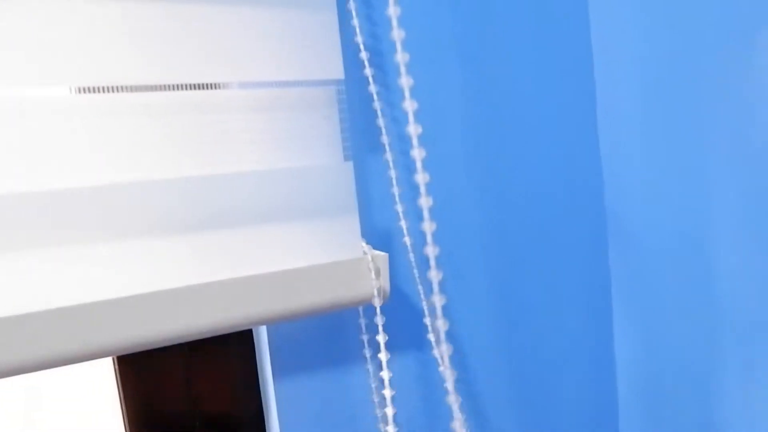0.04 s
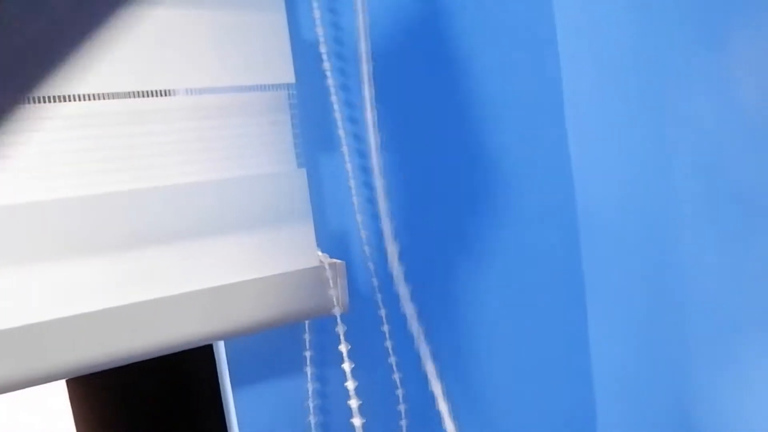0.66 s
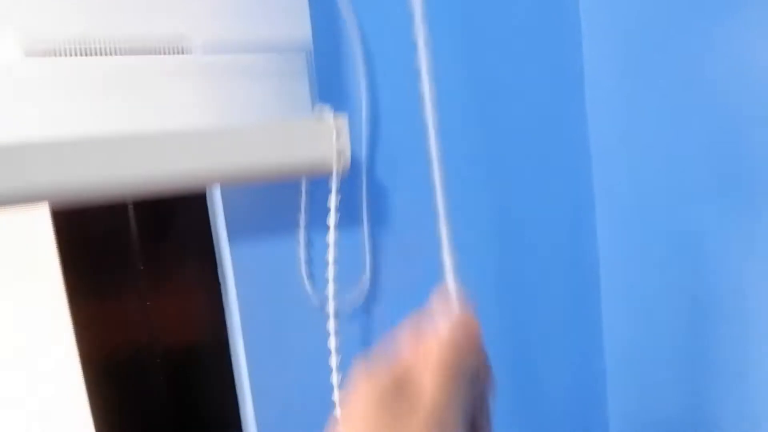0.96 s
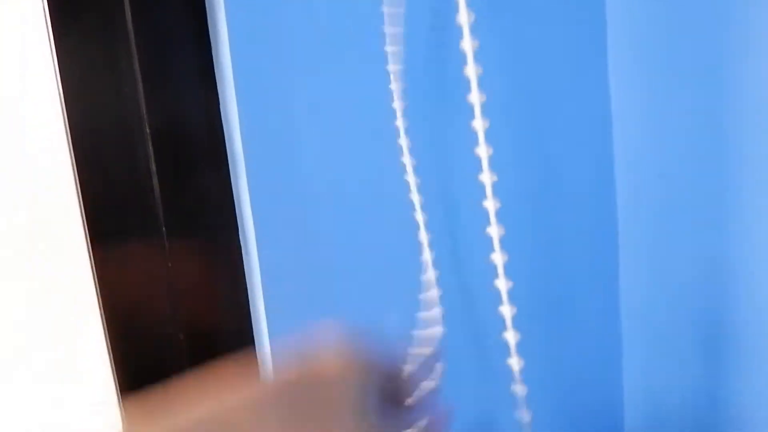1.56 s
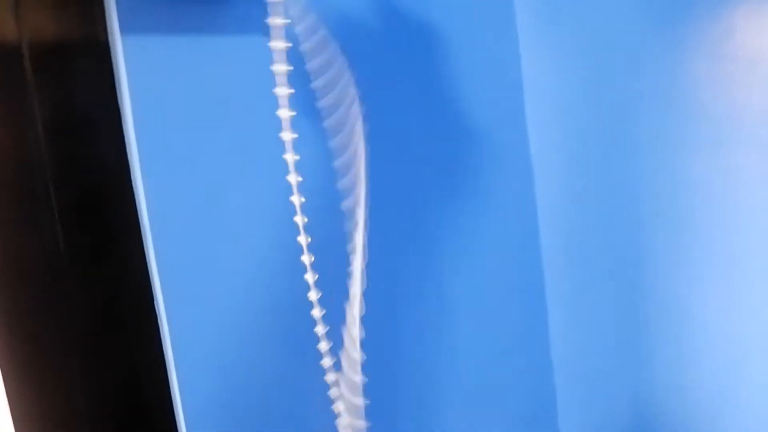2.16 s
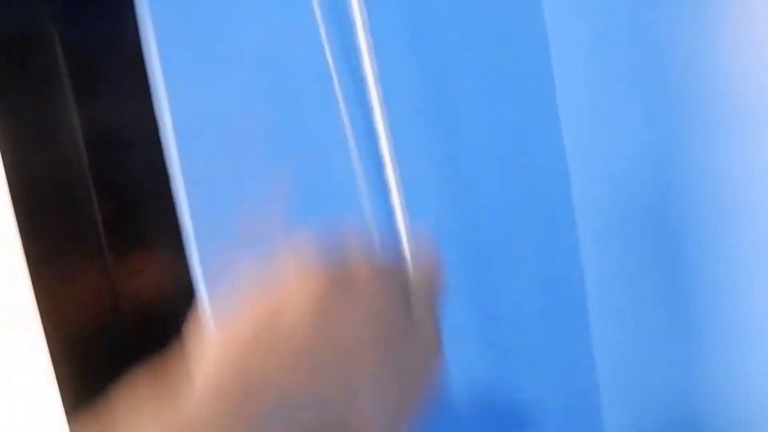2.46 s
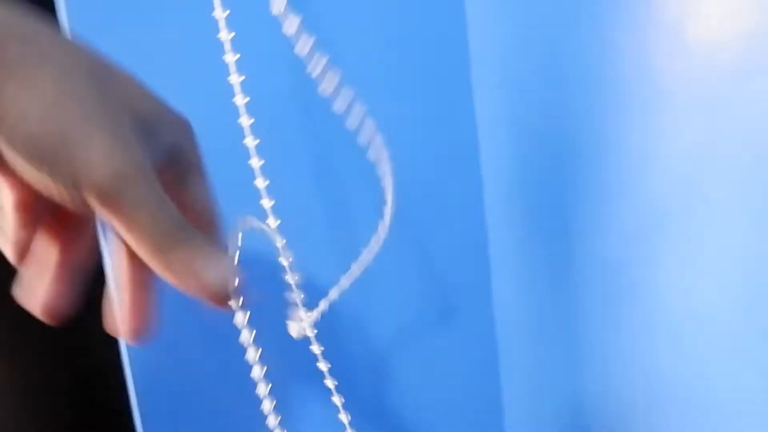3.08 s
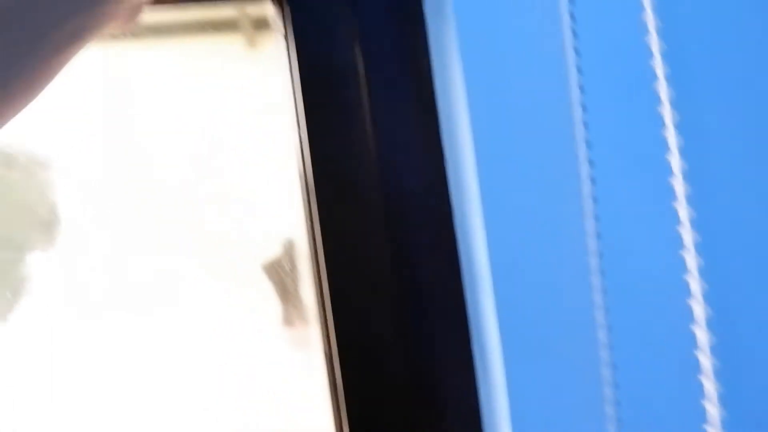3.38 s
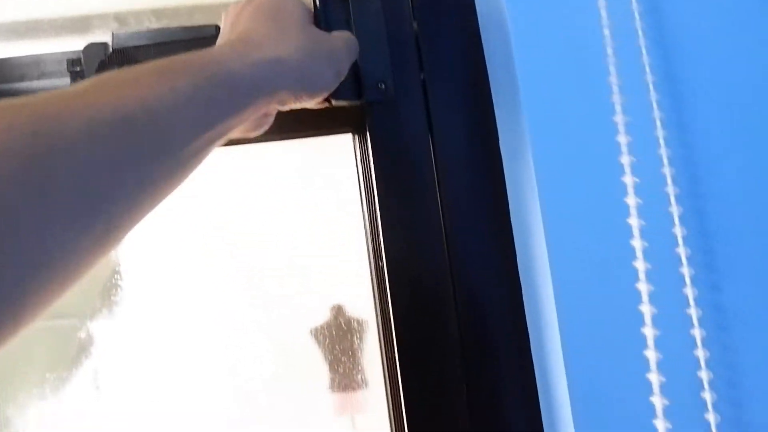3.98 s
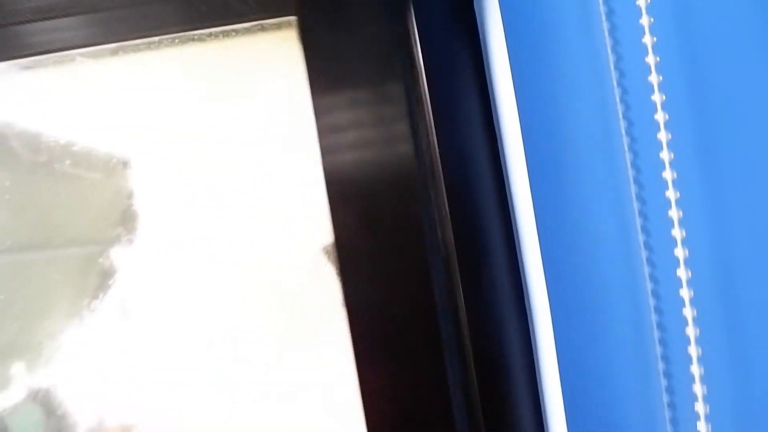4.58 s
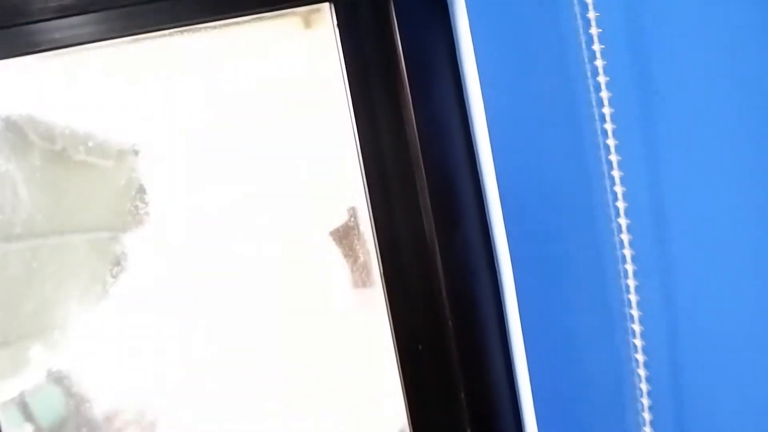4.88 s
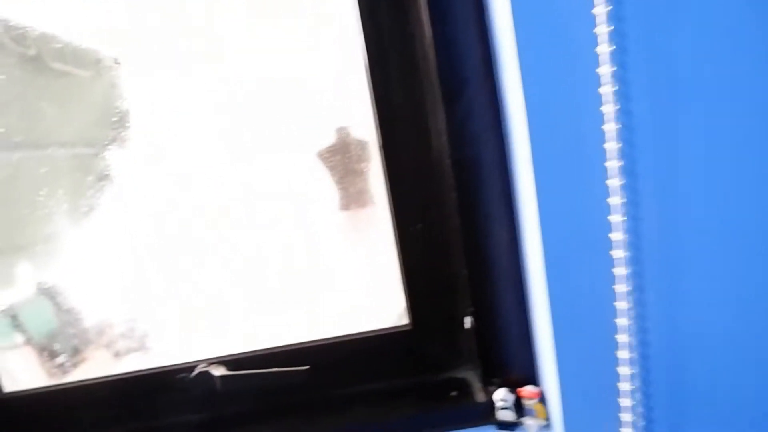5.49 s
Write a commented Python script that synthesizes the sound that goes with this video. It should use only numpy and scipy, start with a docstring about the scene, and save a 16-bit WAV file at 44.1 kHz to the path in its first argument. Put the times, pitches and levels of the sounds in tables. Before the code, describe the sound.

Two bursts of bead chain rattling and hollow rumbling come from a nearby roller blind being raised indoors. Between and after the pulls, the loose chain clicks and rings against a metal frame. Soft latch bumps and rubbing follow, then one heavy window knock, a low shudder of glass and a short scrape of seals, over a faint, steady hush with a little room echo.

```python
"""A roller blind is hauled up in two pulls on its plastic bead chain, in a small room.
Beads rattle through the sprocket (the toothed wheel), the blind's tube rumbles and jolts,
and the slack chain clacks on the metal window frame and makes it ring. Then a hand works the latch,
the frame gives with a knock, and the window scrapes open on its seals while the pane shudders.
A steady hush from outdoors and the room lies under it all."""
import sys
import numpy as np
from scipy import signal
from scipy.io import wavfile
from scipy.ndimage import uniform_filter1d

SR = 44100
rng = np.random.default_rng(int(sys.argv[2]) if len(sys.argv) > 2 else 0)


def inscribe(sig):
    """Save sig as 16-bit PCM at rate SR to the path in sys.argv[1].

    A 1-D sig is mono; a 2-D sig holds one channel per row.
    Samples are clipped to [-1, 1] before scaling.
    """
    pcm = np.round(np.clip(np.atleast_2d(sig).T, -1, 1) * 32767)
    wavfile.write(sys.argv[1], SR, pcm.astype(np.int16))


N = 244174
TIME = np.arange(N) / SR
AGE = TIME[:SR // 2]  # seconds since a hit
TOP_HZ = 15900

# Levels are relative. fade_s is the time to fall 60 dB, rise_s the time to climb 60 dB.
# pulls on the chain: grip_s, fastest_s, let_go_s, rise_s, beads_db, tube_db
PULLS = [(0, 0.017, 0.024, 0.009, -59, -22.5), (0.833, 1.173, 1.262, 0.019, -23, -23.5),
         (2.368, 2.508, 2.732, 0.49, -17, -23.5)]
# the tube lurches round under a tug: start_s, length_s, level_db
LURCHES = [(0.84, 0.037, -12.5), (1.151, 0.026, -19.5), (1.402, 0.025, -23), (2.155, 0.025, -23.5),
           (2.395, 0.053, -12.5), (2.596, 0.077, -22), (2.845, 0.034, -22)]
LURCH_RISE_S, LURCH_FADE_S = 0.047, 0.099
# the tube jolts in its brackets: start_s, level_db, brightness_db, fade_s
JOLTS = [(0.04, -20.5, -10, 0.057), (0.833, -6.5, 4.5, 0.11), (0.845, -3, 18, 0.031),
         (0.869, -15, -7, 0.12), (0.891, -1.5, 1, 0.038), (0.902, -3.5, -9, 0.068),
         (1.072, -12, 3.5, 0.037), (1.137, -19.5, 28, 0.28), (1.166, -10.5, 7, 0.06),
         (1.192, -14, 0, 0.029), (1.261, -11.5, 6, 0.45), (1.386, -19.5, -10, 0.04), (1.542, -14, 7, 0.05),
         (1.557, -15, 4, 0.041), (1.573, -12, 5, 0.14), (2.359, -8, -31, 0.13), (2.46, -12, -3, 0.056),
         (2.693, -9, 0.5, 0.22), (2.808, -19, -2.5, 0.11), (2.842, -14.5, 3, 0.088)]
# light ticks of beads and latch: start_s, level_db, brightness_db
TICKS = [(0.35, -40.5, 20), (0.522, -40.5, 19), (1.7377, -26.5, -6), (1.7733, -32, 24), (1.836, -32.5, 22),
         (2.8975, -33, 13), (3.4108, -33.5, 3), (3.652, -27, -16), (4.5292, -24.5, -20), (4.874, -36.5, 3),
         (5.018, -28.5, -1.5), (5.0417, -25.5, -9)]
# the chain hits the frame and its fittings: start_s, level_db, pitch_hz, brightness_db, fade_s, ring_db, part
CLACKS = [ (0.847, -23, 6860, 18, 0.033, -38, "long"), (1.447, -16, 9100, -6.5, 0.057, -15, "long"),
          (1.462, -18.5, 2930, -14, 0.08, 11, "long"), (1.483, -15, 5070, -14, 0.081, -17.5, "long"),
          (1.543, -21, 3760, -38, 0.081, -19, "long"), (1.572, -23.5, 4100, -29, 0.21, -8, "long"),
          (1.583, -20, 13600, 22, 0.035, -21, "high"), (1.868, -12, 8600, 9, 0.17, -12, "bright"),
          (1.888, -18.5, 3620, -17, 0.056, -17.5, "bright"), (1.8938, -18, 3420, 3, 0.051, -16, "bright"),
          (1.945, -26.5, 2580, -10, 0.18, -18, "bright"), (2.124, -15, 5800, -7.5, 0.14, -15, "long"),
          (2.2084, -20.5, 3260, 11, 0.06, -9, "bright"), (2.2149, -13.5, 2860, 4, 0.021, -51, "long"),
          (2.2227, -15, 3000, -1, 0.044, -48, "long"), (2.264, -23, 3100, -6, 0.018, -38, "long"),
          (2.281, -24.5, 8950, 23, 0.12, -36, "high"), (2.476, -8.5, 2120, -26, 0.0056, -57, "bright"),
          (2.486, -12, 2400, -28, 0.022, -46, "long"), (2.509, -19, 2800, -3, 0.054, -32, "long"),
          (2.524, -15, 2600, -21, 0.081, -34, "long"), (2.539, -14.5, 2380, -15, 0.046, -43, "bright"),
          (2.59, -18.5, 2880, -21, 0.071, -21, "long"), (2.602, -21, 2930, -40, 0.029, -34, "bright"),
          (2.986, -14, 9450, -0.5, 0.043, -13, "high"), (3.0912, -16, 4020, -7, 0.1, -51, "damped"),
          (3.1666, -33.5, 5500, 12, 0.006, -61, "damped")]
# a bead snags in the sprocket: start_s, level_db
SNAGS = [(0.897, -24), (0.958, -33), (0.965, -33), (1.101, -35), (1.13, -25), (1.303, -24.5), (2.868, -34)]
# hollow clunks of the blind: start_s, level_db
CLUNKS = [(1.591, -13.5), (2.363, -12.5), (2.633, -15)]
# slack beads slide along the frame: start_s, length_s, level_db, rise_s, fade_s
CHAIN_SLIDE = (3.112, 0.054, -31, 0.03, 0.006)
# the pushed pane shudders: start_s, length_s, level_db, fade_s, pitch_hz
SHUDDERS = [(3.158, 0.2, -36.5, 0.79, 83.2), (4.226, 0.053, -30, 1, 53.6), (4.273, 0.19, -37.5, 0.85, 152),
            (5.026, 0.029, -31.5, 0.37, 85.4)]
# the window rubs on its seals: start_s, length_s, level_db, rise_s, fade_s
RUBS = [(3.419, 0.068, -32.5, 0.053, 0.24), (3.585, 0.28, -43, 0.28, 0.88),
        (5.057, 0.0087, -29.5, 0.21, 0.14), (5.112, 0.047, -25.5, 0.16, 0.29)]
# the hand bumps the latch: start_s, level_db
LATCH_BUMPS = [(3.446, -21), (3.4953, -20.5), (3.702, -32)]
# blows on the window: start_s, level_db, brightness_db, bass_db, thud_db
KNOCKS = [(3.904, -24.5, -10, -1, -4), (4.2028, -5.5, -7, -6, -1.5), (4.218, -12.5, 6, 12.5, -0.5)]

# the tones each thing rings with when hit: pitch_hz, level_db, fade_s
TUBE_TONES = [(135.1, -0.5, 0.31), (449.6, 5.5, 0.08), (490, 8, 0.075), (990, -9, 0.36), (1200, -24, 0.076),
              (1314, 6, 0.074), (1605, -14, 0.96), (1642, 4, 0.095), (2176, -2.5, 0.31)]
CLUNK_TONES = [(365, 6, 0.08), (466, -3, 0.055), (566, 4, 0.055)]
HOLLOW_FRAME_TONES = [(150, -13, 0.12), (264, 0, 0.36), (281, -6, 0.22), (409, -13, 0.25)]
WINDOW_TONES = [(53.5, -19, 0.3), (137, -15, 0.4), (166, -7, .2), (206, -4, 0.17), (257, 5, 0.17),
                (262, -16, 0.6), (400, -9, 0.16), (447, -4, 0.1), (645, 5, 0.07)]
# the tones the chain can set ringing where it lands, by kind: the metal frame struck at two different places
# (long, bright), a high-ringing metal part, and a plastic part that barely rings: # pitch_hz, level_db
RING_TONES = dict( long=[(1550, -5), (2030, -5), (2560, -7), (2790, -2), (3106, -7), (3672, -1),
               (4387, -5), (4850, -2), (5356, 0), (5760, -4)], bright=[(2035, 4), (2525, -3), (2795, -4),
               (3305, -2), (4177, -3), (4409, -3), (5523, -1), (6080, 1), (6455, 7), (7725, -1), (8220, -1),
               (9835, 6), (12900, 2)], high=[(2990, -8), (3300, -5), (6020, 7), (7540, -1), (7780, 3),
               (8500, 2), (8931, -2), (9679, 1), (10310, 1), (11200, 0), (12350, 1), (12950, 6), (13340, 4),
               (14000, -1), (15200, 0)], damped=[(3300, 9), (4200, 13), (4900, 9)])
# how long each part rings at 3000 Hz: fade_s
RING_FADE_S = dict(long=.33, bright=.26, high=.25, damped=.04)
# how far each part's tones stand out in the chatter of the beads: height_db
RING_PEAK_DB = dict(long=6, bright=8, high=14, damped=7)

# tone colours, or how strong each sound is from low to high: pitch_hz, level_db
HUSH_COLOUR = [(12, -61), (20, -29), (65, -5), (399, -8), (698, -4.5), (1330, -18.5), (2670, -27),
               (16000, -38)]
HOUSING_COLOUR = [(40, -37), (90, -22), (125, -4.5), (190, -8), (300, -9), (430, 2), (560, 6.5), (800, 5),
                  (1250, 4), (1500, 0), (1900, -6.5), (2800, -15.5), (6000, -16), (16000, -42)]
SPROCKET_COLOUR = [(200, -44), (1200, 16), (2200, 3.5), (3000, -0.5), (4500, 2.5), (6100, 7.5),
                   (7400, -0.5), (10000, -2), (12000, -9), (16000, -14.5)]
TICK_COLOUR = [(100, -32), (600, 18.5), (2600, 18.5), (3600, 9.5), (5000, 13), (8000, 1), (16000, -6.5)]
CLACK_COLOUR = [(40, -59), (300, -26.5), (1400, -8), (1750, -7.5), (2000, -4), (2700, 0), (5300, -0.5),
                (8800, -2.5), (13300, -7), (16000, -18)]
PANE_COLOUR = [(15, -22), (35, -4), (54, 3), (72, -4), (100, -9), (145, -1), (230, -9), (500, -36),
               (2000, -80)]
SEAL_COLOUR = [(100, -3), (270, 6), (400, 1.5), (700, 6.5), (1500, 5), (2400, 7.5), (3500, -11), (5500, -7),
               (8000, -13.5), (11000, -29)]
THUD_COLOUR = [(30, -20), (110, -13), (280, 0), (700, 0), (1100, -7), (2700, -21), (4000, -31),
               (16000, -50)]
KNOCK_BASS_COLOUR = [(15, -32), (50, 8), (100, -19), (145, 4)]
# how long the room echoes: pitch_hz, fade_s
ROOM_FADES = [(100, 0.99), (300, 0.34), (1800, 0.43), (5000, 0.32), (13000, 0.24)]
# how much the hush and the echoes differ between left and right: pitch_hz, level_db
HUSH_WIDTH = [(20, -44), (1400, -17.5), (2800, -5.5), (13000, 1.5)]
ECHO_WIDTH = [(250, -66), (1200, -74), (2500, -39), (12000, -46)]


def amp(db):
    """Turns decibels into a number to multiply by."""
    return 10 ** (np.asarray(db) / 20)


def rms(x):
    """The average strength of a signal (root mean square)."""
    return np.sqrt(np.mean(x ** 2) + 1e-20)


def look_up(points, hz):
    """Reads between the rows of a (pitch_hz, value) table, on a musical pitch scale."""
    pitches, values = np.transpose(points)
    return np.interp(np.log(hz + 1), np.log(pitches + 1), values)


def coloured(x, colour, bright_db=0):
    """Gives a sound a tone colour, adding bright_db for each tenfold rise in pitch above 350 Hz."""
    hz = abs(np.fft.fftfreq(8192, 1 / SR))
    log_gain = np.log(amp(look_up(colour, hz) + bright_db * np.log10(np.maximum(hz, 350))))
    taps = np.fft.ifft(np.exp(np.conj(signal.hilbert(log_gain)))).real  # nothing sounds before the hit
    return signal.oaconvolve(x, taps)[:len(x)]


def humped(colour, pitch_hz, height_db, octaves):
    """A tone colour with a smooth boost around one pitch."""
    hz = np.geomspace(15, 16000, num=1000)
    hump_db = height_db * np.exp(-(np.log2(hz / pitch_hz) / octaves) ** 2)
    return np.column_stack([hz, look_up(colour, hz) + hump_db])


def add_hit(mix, start_s, db, sound):
    """Adds a hit to the mix, with its first 10 ms at the given level."""
    part = mix[round(start_s * SR):][:len(sound)]
    part += (amp(db) * sound / rms(sound[:SR // 100]))[:len(part)]


def fade(fade_s):
    """A level that falls 60 dB in fade_s."""
    return np.exp(-np.log(1000) * AGE / np.maximum(fade_s, 0.002))


def burst(fade_s):
    """Fading noise: a spray of tiny contacts."""
    return rng.standard_normal(len(AGE)) * fade(fade_s)


def ring(tones):
    """The tones of a struck object, each fading at its own speed."""
    return sum(amp(db) * fade(fade_s) * np.sin(2 * np.pi * hz * AGE) for hz, db, fade_s in tones)


def rattle(per_s, spread_db, grit_db):
    """Clicks of uneven spacing and size over fine sliding grit, held at a steady level."""
    passed = np.cumsum(rng.exponential(1, N // 128 + 1).repeat(128)[:N]) * per_s / SR
    clicks = np.diff(np.floor(passed), prepend=0)  # one click at each whole number
    clicks = clicks * amp(spread_db * rng.standard_normal(N)) * rng.choice([-1, 1], N)
    force = clicks / rms(clicks) + amp(grit_db) * rng.standard_normal(N)
    return force / np.sqrt(uniform_filter1d(force ** 2, size=1800) + 1e-9)


def swell(start_s, length_s, db, rise_s, fade_s):
    """A level that climbs until start_s, holds for length_s, then fades."""
    before = np.maximum(start_s - TIME, 0) / max(rise_s, 0.002)
    after = np.maximum(TIME - start_s - length_s, 0) / max(fade_s, 0.002)
    return amp(db) * np.exp(-np.log(1000) * (before + after))


def pull(grip_s, let_go_s, rise_s, db):
    """The level of one pull: the chain tightens, runs, and coasts to rest."""
    return swell(grip_s, let_go_s - grip_s, db, rise_s, fade_s=0.23)


def together(levels):
    """Joins the levels of overlapping movements by adding their power."""
    return np.linalg.norm(levels, axis=0)


def hush():
    """Steady background noise from outdoors and the room."""
    air = coloured(rng.standard_normal(N), HUSH_COLOUR)
    return amp(-38.5) * air / rms(air)


def roller_tube():
    """The clutch that turns the tube chatters and jolts; the tube and its housing ring along."""
    body = amp(-21) * ring(TUBE_TONES) / np.sqrt(SR / 100)
    body[0] += 1  # the direct push of each contact
    body = coloured(body, HOUSING_COLOUR)
    pulls = [pull(grip_s, let_go_s, rise_s, db) for grip_s, _, let_go_s, rise_s, _, db in PULLS]
    lurches = [swell(*lurch, LURCH_RISE_S, LURCH_FADE_S) for lurch in LURCHES]
    chatter = amp(-1) * together(pulls + lurches) * rattle(per_s=400, spread_db=0.5, grit_db=-4)
    out = signal.fftconvolve(chatter, body / np.linalg.norm(body))[:N]
    for start_s, db, bright_db, fade_s in JOLTS:
        jolt = burst(fade_s) + amp(-24) * ring(TUBE_TONES)
        add_hit(out, start_s, db - 6, coloured(jolt, HOUSING_COLOUR, bright_db))
    return out


def running_beads(pip_fade_s=0.005, sag_db_per_s=40, surge_db=1.4):
    """Beads snap through the sprocket with tiny ringing pips, loudest when a pull is fastest."""
    pips = np.zeros(N)
    for hz in np.geomspace(1800, 13000, num=22):
        pip = ring([(hz, 0, pip_fade_s)]) + amp(-10) * burst(pip_fade_s)
        starts = rng.integers(0, N, round(hz / 65 * N / SR))  # higher pips come more often
        sizes = amp(4 * np.clip(rng.standard_normal(len(starts)), -2, 2))
        pips += signal.oaconvolve(np.bincount(starts, sizes, N), pip[:SR // 50])[:N]
    snaps = rattle(per_s=150, spread_db=4, grit_db=2)
    clicks = coloured(pips / rms(pips) + amp(-3) * snaps, SPROCKET_COLOUR)
    pulls = [pull(grip_s, let_go_s, rise_s, db - sag_db_per_s * abs(TIME - fastest_s))
             for grip_s, fastest_s, let_go_s, rise_s, db, _ in PULLS]
    lurches = [amp(-22) * swell(*lurch, LURCH_RISE_S, LURCH_FADE_S) for lurch in LURCHES]
    surges = uniform_filter1d(rng.standard_normal(N), size=600)  # the chain runs unevenly
    clicks *= amp(surge_db * surges / rms(surges))
    return amp(-1) * together(pulls + lurches) * clicks / rms(clicks)


def light_ticks():
    """Beads and latch make small, dry contacts."""
    out = np.zeros(N)
    for start_s, db, bright_db in TICKS:
        add_hit(out, start_s, db - 4, coloured(burst(fade_s=0.098), TICK_COLOUR, bright_db))
    return out


def part_ring(part, weak_count=220):
    """One part rings with a few clear tones among many weak ones; high ones fade sooner."""
    def struck(hz, db):
        return ring(zip(hz, db, RING_FADE_S[part] * (3000 / hz) ** 0.4))
    hz, db = np.transpose(RING_TONES[part])
    clear = struck(hz, db - 3 - RING_PEAK_DB[part])  # chatter_colour lifts these tones back up
    weak = struck(rng.uniform(hz.min(), TOP_HZ, weak_count), np.full(weak_count, -3))
    return clear + weak * np.sqrt(2 / weak_count)


def chatter_colour(part, pitch_hz, height_db, octaves):
    """The colour of beads on a part: a broad hump for the click, a narrow peak at each of its tones."""
    hz, db = humped(CLACK_COLOUR, pitch_hz, height_db, octaves).T
    peaks = [np.exp(-((hz / tone_hz - 1) / 0.02) ** 2) for tone_hz, _ in RING_TONES[part]]
    return np.column_stack([hz, db + RING_PEAK_DB[part] * np.max(peaks, axis=0)])


def chain_clacks():
    """The slack chain lands bead after bead and sets the struck part ringing, with a dense, noisy tail of weak
    tones."""
    out = np.zeros(N)
    rings = {part: part_ring(part) for part in RING_TONES}
    for start_s, db, pitch_hz, bright_db, fade_s, ring_db, part in CLACKS:
        landing = burst(fade_s)
        dense_tail = amp(-2) * burst(fade_s=0.41)
        clack = landing + amp(ring_db) * (rings[part] + dense_tail)
        colour = chatter_colour(part, pitch_hz, height_db=8, octaves=0.56)
        add_hit(out, start_s, db, coloured(clack, colour, bright_db))
    return out


def bead_snags():
    """Single beads catch on the sprocket's rim and snap free."""
    out = np.zeros(N)
    for start_s, db in SNAGS:
        add_hit(out, start_s, db, coloured(burst(fade_s=0.058), SPROCKET_COLOUR, bright_db=6))
    return out


def blind_clunks():
    """A short clatter rings a few low tones of the blind, which die quickly."""
    out = np.zeros(N)
    for start_s, db in CLUNKS:
        clatter = amp(-9) * burst(fade_s=0.079)
        clatter[0] += 1  # the blow itself
        clunk = signal.fftconvolve(clatter, ring(CLUNK_TONES))
        add_hit(out, start_s, db, coloured(clunk, [(50, -28), (250, -6), (360, -5.5), (16000, 19)]))
    return out


def chain_slide():
    """Slack beads skitter with a dull sound that barely rings, and stop dead."""
    colour = chatter_colour("damped", pitch_hz=5400, height_db=4.6, octaves=0.68)
    skitter = coloured(rattle(per_s=400, spread_db=0.5, grit_db=-8), colour, bright_db=-23)
    return amp(-1) * swell(*CHAIN_SLIDE) * skitter / rms(skitter)


def pane_shudders():
    """Each push sets the pane rumbling around one low pitch."""
    out = np.zeros(N)
    for start_s, length_s, db, fade_s, pitch_hz in SHUDDERS:
        colour = humped(PANE_COLOUR, pitch_hz, height_db=21, octaves=0.16)
        rumble = coloured(rng.standard_normal(N), colour)
        out += swell(start_s, length_s, db - 1, rise_s=0.067, fade_s=fade_s) * rumble / rms(rumble)
    return out


def seal_scrape():
    """The window's seals stick and slip in fine grains, brighter when pushed faster."""
    grains = rattle(per_s=600, spread_db=5, grit_db=5)
    speed = together([swell(*rub) for rub in RUBS])
    fast = coloured(grains, SEAL_COLOUR)
    slow = coloured(grains, SEAL_COLOUR, bright_db=-6)
    fast_share = speed / speed.max()
    return speed * (fast_share * fast / rms(fast) + (1 - fast_share) * slow / rms(slow))


def latch_bumps():
    """The hand bumps the latch; the hollow frame answers with one low note."""
    out = np.zeros(N)
    note = ring(HOLLOW_FRAME_TONES)
    for start_s, db in LATCH_BUMPS:
        thud = coloured(burst(fade_s=0.2), THUD_COLOUR)
        add_hit(out, start_s, db, note / rms(note) + amp(-5) * thud / rms(thud))
    return out


def window_knocks():
    """Frame and pane boom with a dull thud; a soft push barely wakes the high tones or deep bass."""
    out = np.zeros(N)
    for start_s, db, bright_db, bass_db, thud_db in KNOCKS:
        thud = coloured(burst(fade_s=0.13), THUD_COLOUR, bright_db)
        boom = coloured(ring(WINDOW_TONES), [(20, 0), (20000, 0)], 2 * bright_db)
        blow = boom / rms(boom[:SR // 100]) + amp(thud_db) * thud / rms(thud[:SR // 100])
        bass_colour = [(hz, low_db + bass_db) for hz, low_db in KNOCK_BASS_COLOUR] + [(250, 0)]
        add_hit(out, start_s, db - 3, coloured(blow, bass_colour))
    return out


def room_echo(x, gap_s=0.0014, echoes_per_s=3000):
    """Sound bounces off the near walls, each pitch range fading at its own speed."""
    echoes = rng.choice([-1., 1.], len(AGE)) * (rng.random(len(AGE)) < echoes_per_s / SR) * (AGE > gap_s)
    hz, age_s, bands = signal.stft(echoes, SR, nperseg=256)
    fades = np.exp(-np.log(1000) * age_s / look_up(ROOM_FADES, hz)[:, None])
    tail = signal.istft(bands * fades, SR)[1]
    return signal.fftconvolve(x, tail / np.linalg.norm(tail))[:N]


def scene():
    """Blind, chain and window in the room; only faint hiss and echoes differ between left and right."""
    blind = roller_tube() + blind_clunks() + running_beads() + bead_snags()
    chain = chain_clacks() + light_ticks()
    window = latch_bumps() + window_knocks() + seal_scrape() + pane_shudders()
    echo = room_echo(amp(-10) * blind + amp(-12) * chain + amp(-7) * window)
    centre = blind + chain + chain_slide() + window + echo + hush()
    side = coloured(hush(), HUSH_WIDTH) + coloured(room_echo(blind + chain + window), ECHO_WIDTH)
    return np.array([centre + side, centre - side])


def record(dry):
    """Rounds off the loudest peaks, then cuts the treble above TOP_HZ."""
    rounded = 0.94 * dry / (1 + dry ** 6) ** (1 / 6)
    treble_cut = signal.firwin(511, TOP_HZ, window=("kaiser", 9), fs=SR)
    return signal.oaconvolve(rounded, treble_cut[None], "same")


dry = scene()
out = record(dry)
inscribe(out)
```